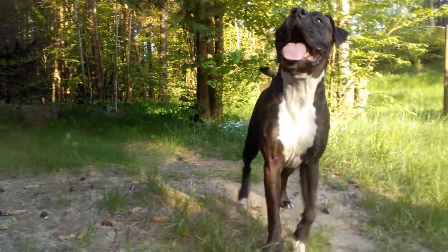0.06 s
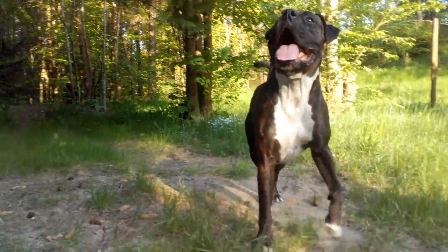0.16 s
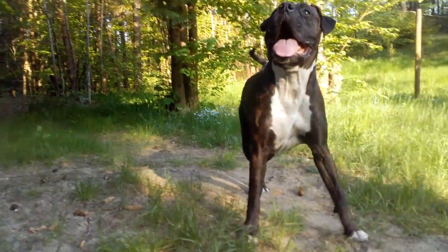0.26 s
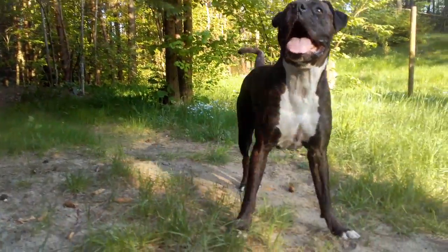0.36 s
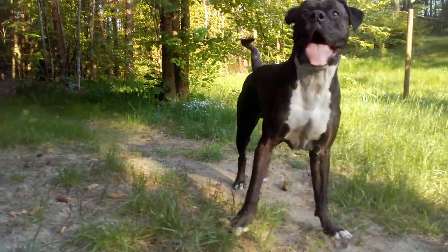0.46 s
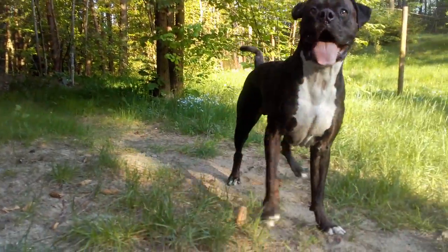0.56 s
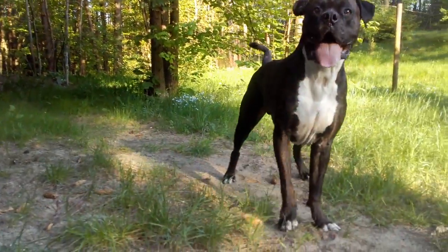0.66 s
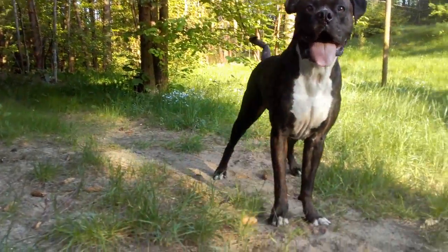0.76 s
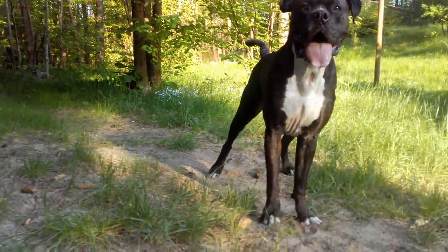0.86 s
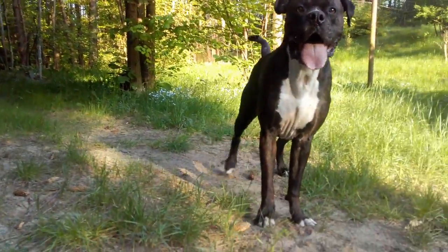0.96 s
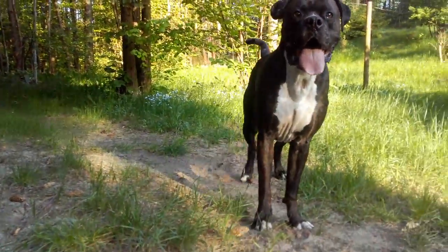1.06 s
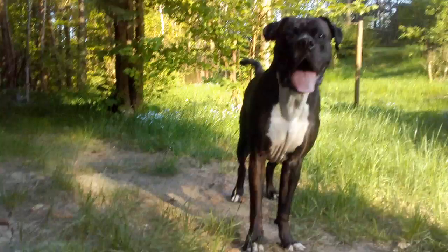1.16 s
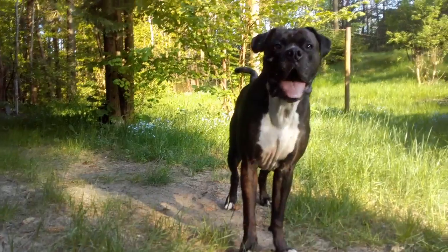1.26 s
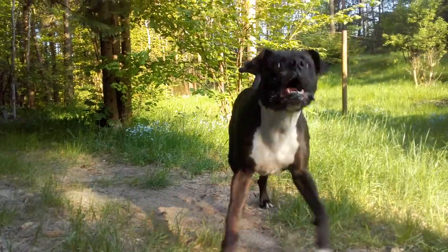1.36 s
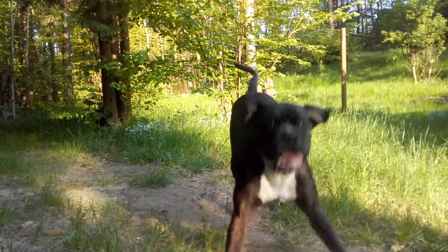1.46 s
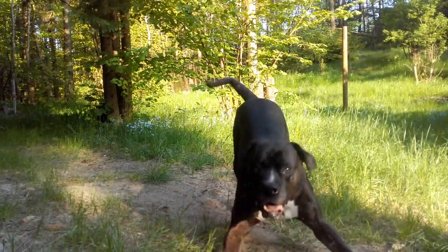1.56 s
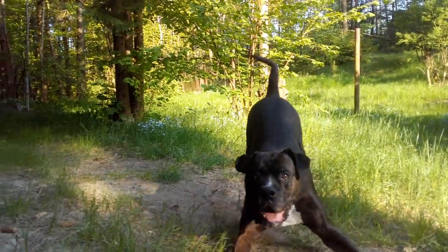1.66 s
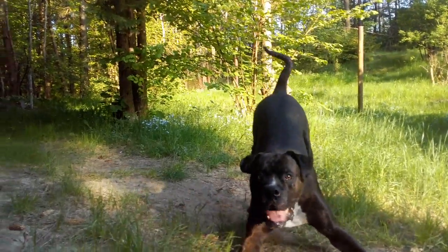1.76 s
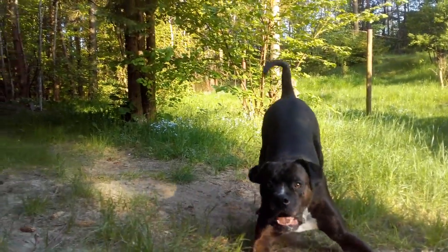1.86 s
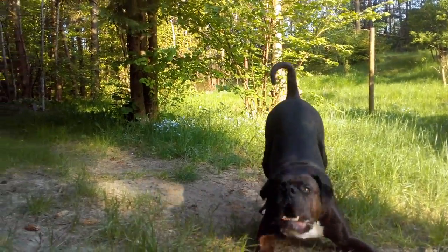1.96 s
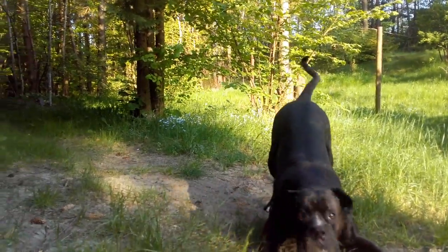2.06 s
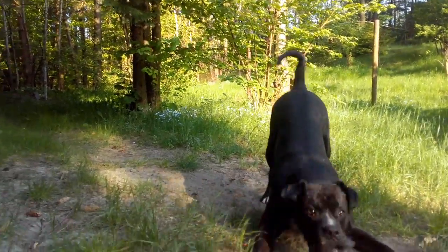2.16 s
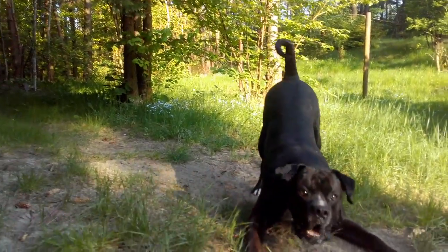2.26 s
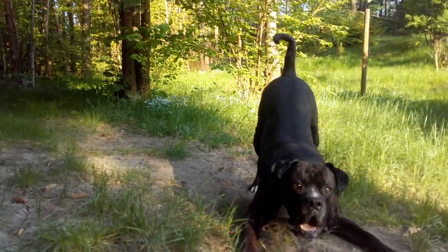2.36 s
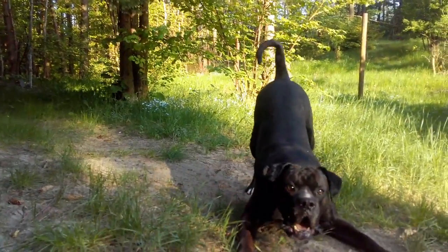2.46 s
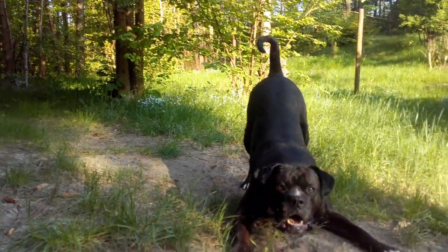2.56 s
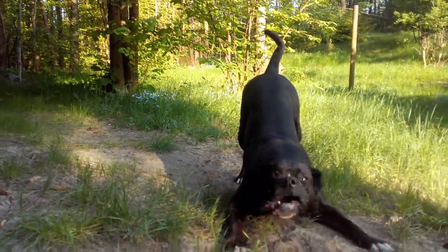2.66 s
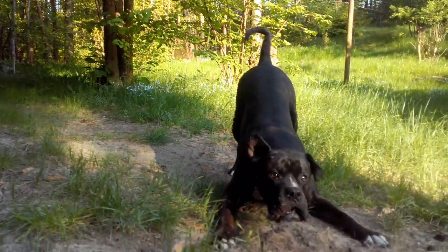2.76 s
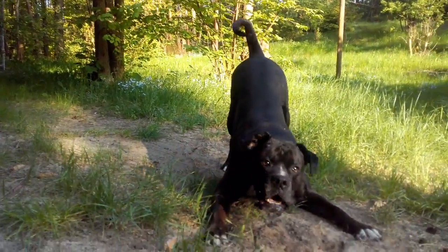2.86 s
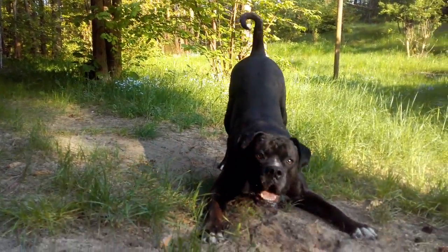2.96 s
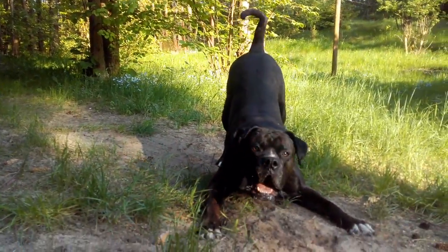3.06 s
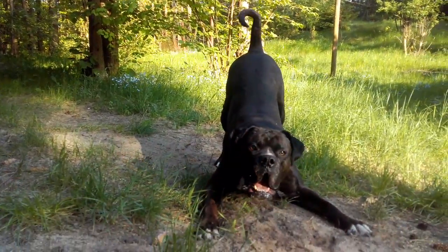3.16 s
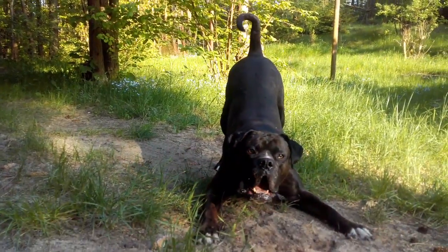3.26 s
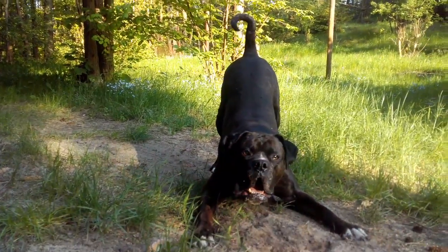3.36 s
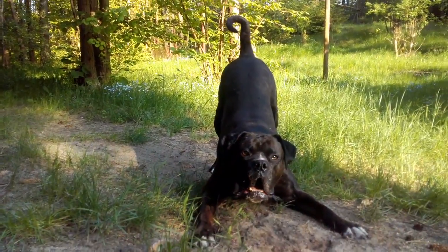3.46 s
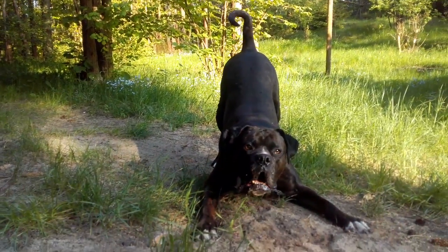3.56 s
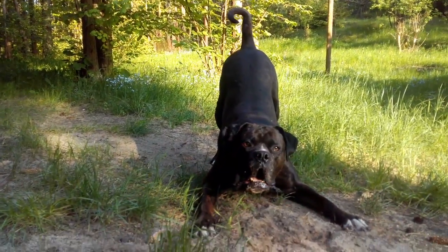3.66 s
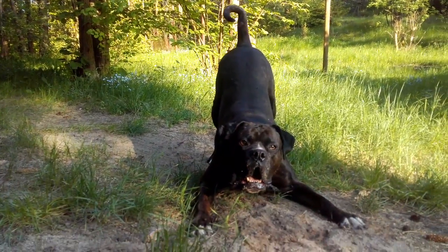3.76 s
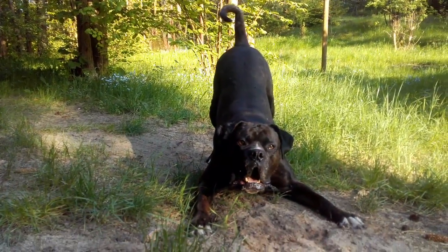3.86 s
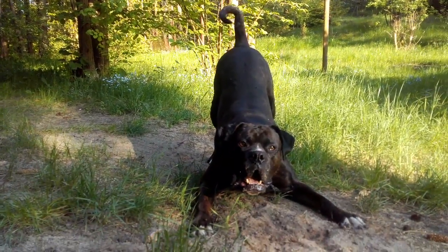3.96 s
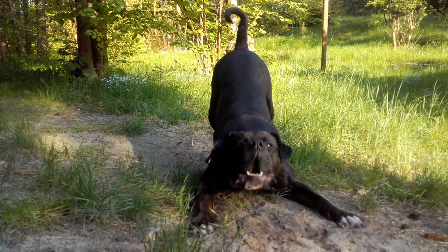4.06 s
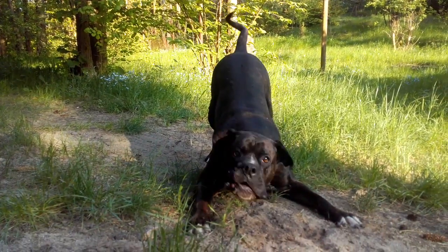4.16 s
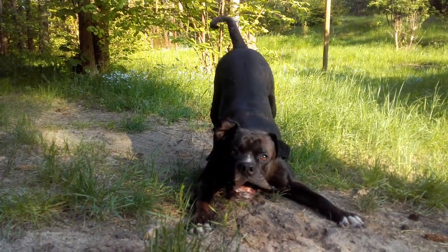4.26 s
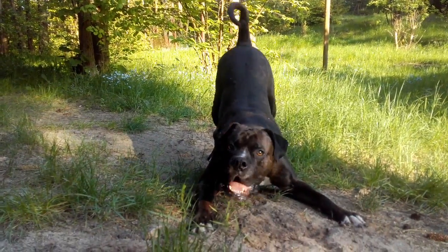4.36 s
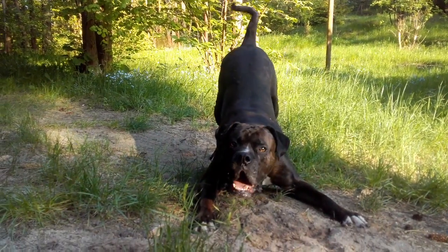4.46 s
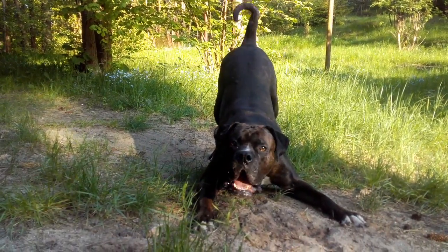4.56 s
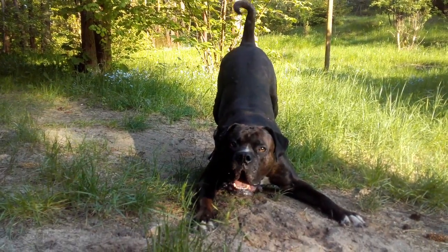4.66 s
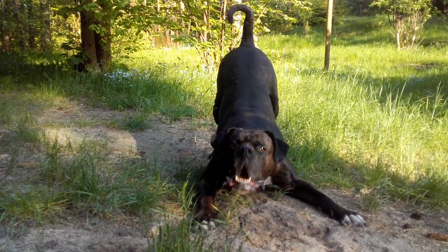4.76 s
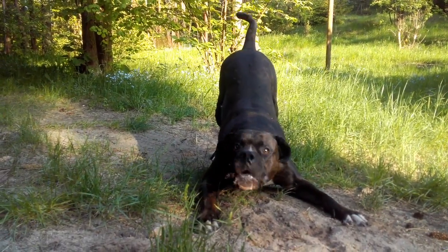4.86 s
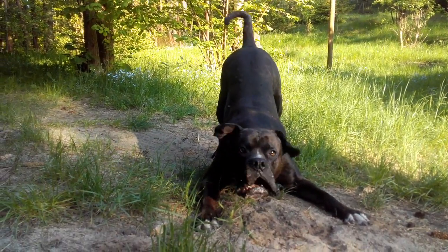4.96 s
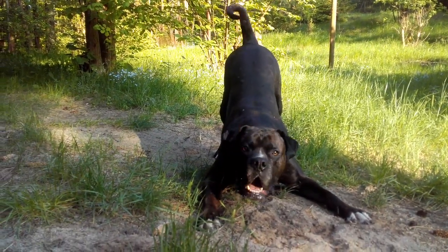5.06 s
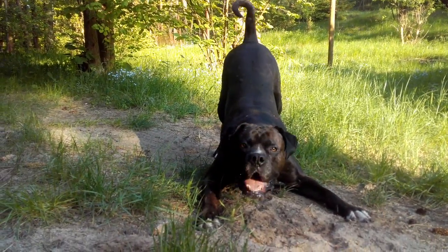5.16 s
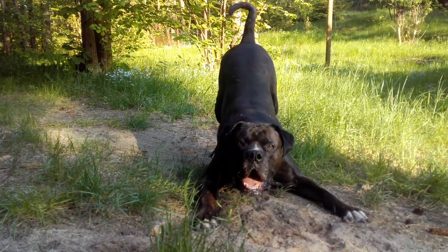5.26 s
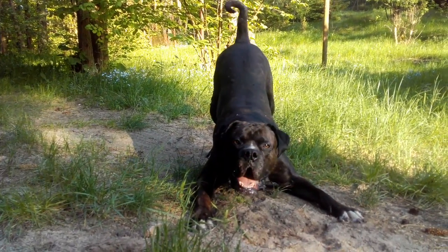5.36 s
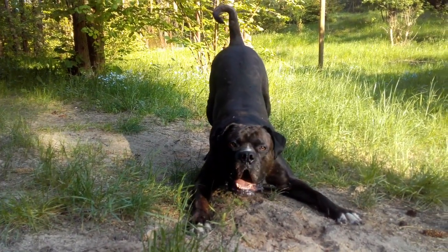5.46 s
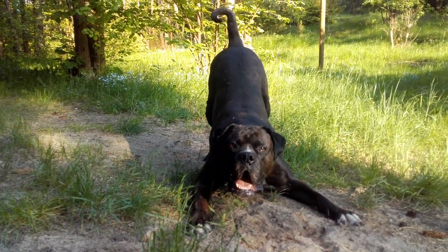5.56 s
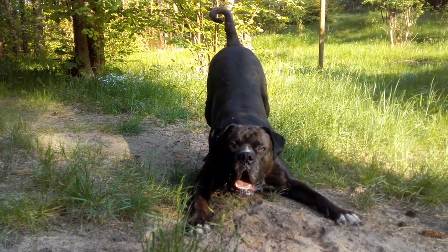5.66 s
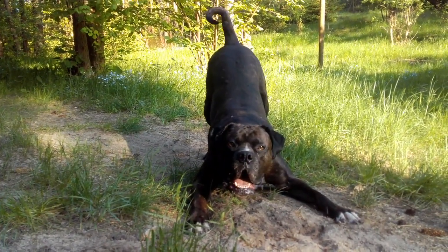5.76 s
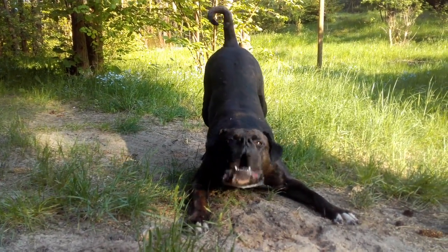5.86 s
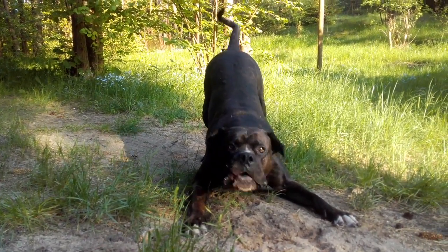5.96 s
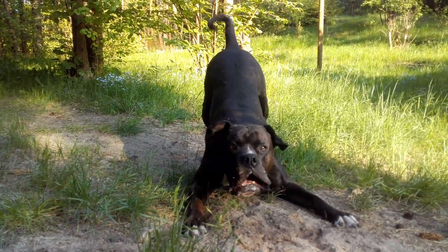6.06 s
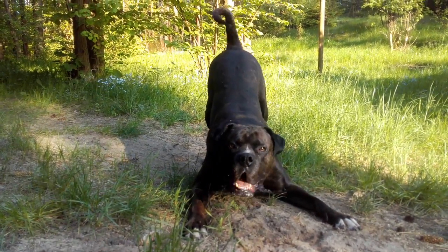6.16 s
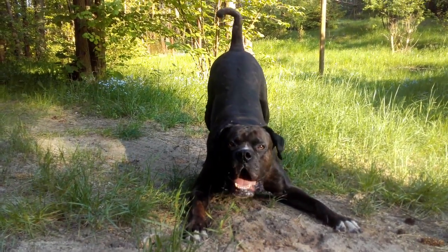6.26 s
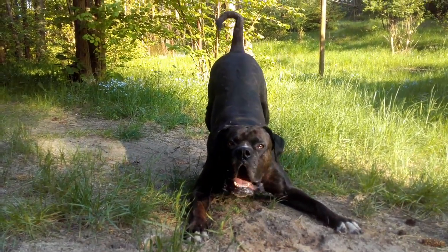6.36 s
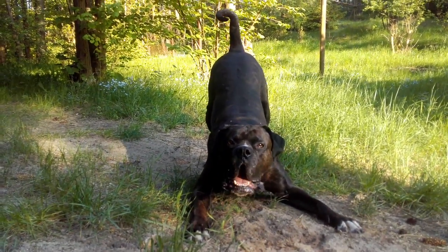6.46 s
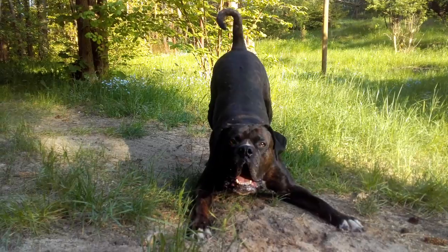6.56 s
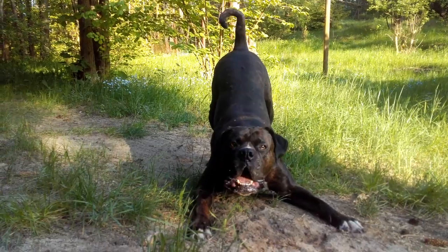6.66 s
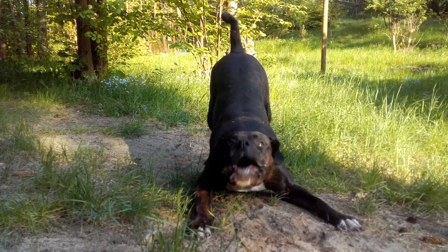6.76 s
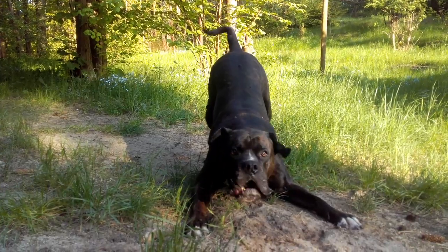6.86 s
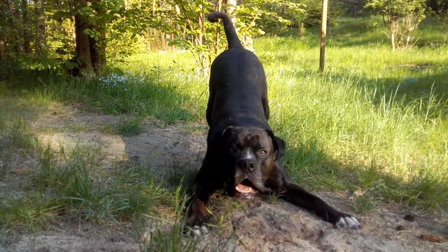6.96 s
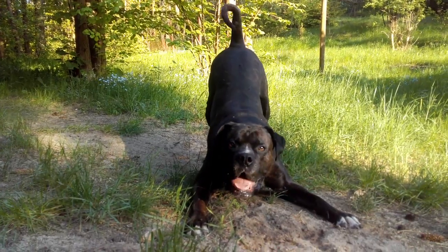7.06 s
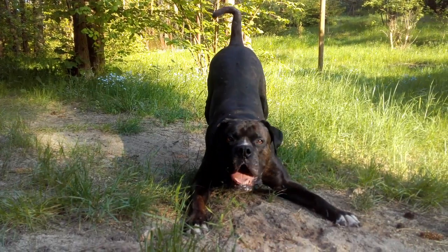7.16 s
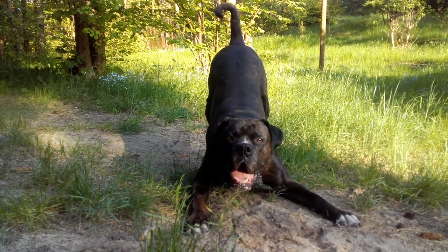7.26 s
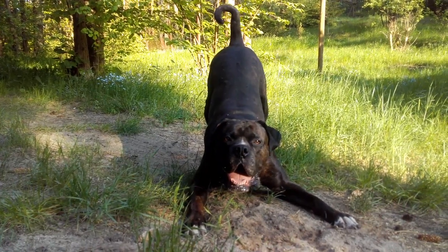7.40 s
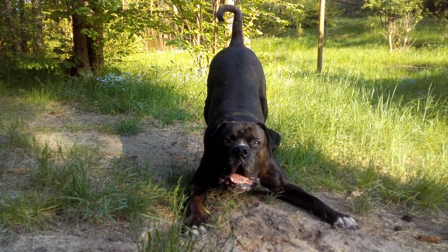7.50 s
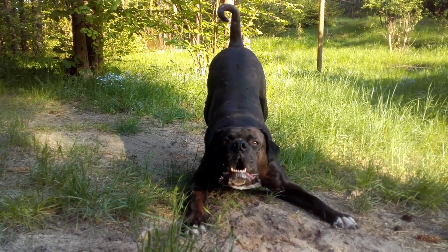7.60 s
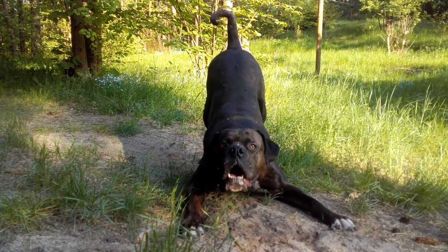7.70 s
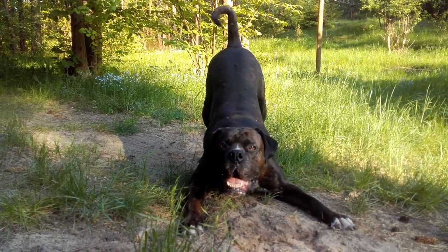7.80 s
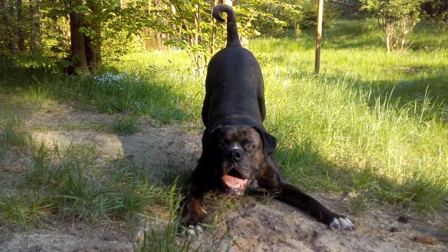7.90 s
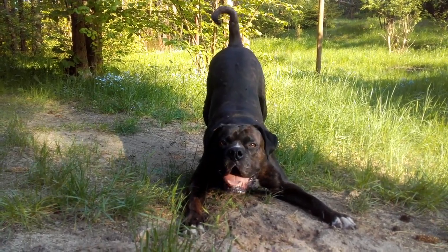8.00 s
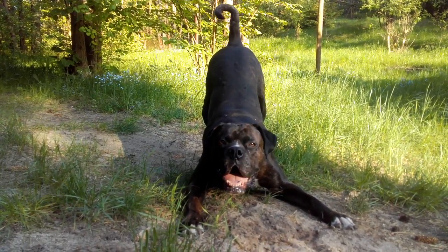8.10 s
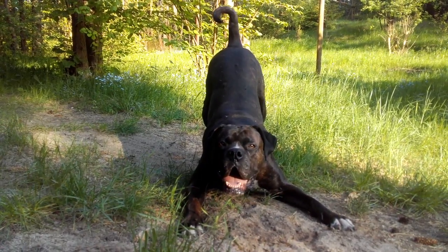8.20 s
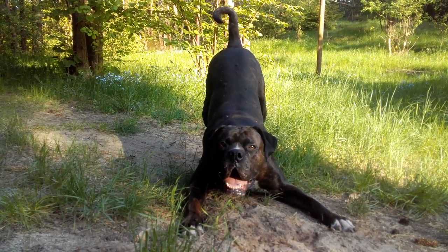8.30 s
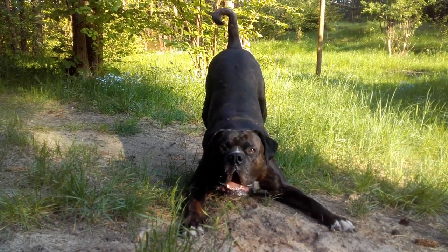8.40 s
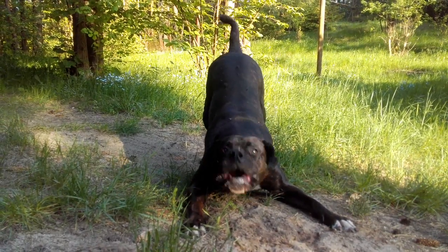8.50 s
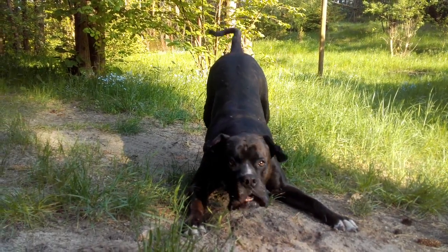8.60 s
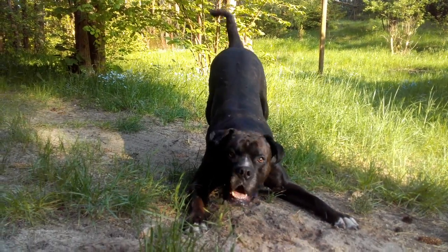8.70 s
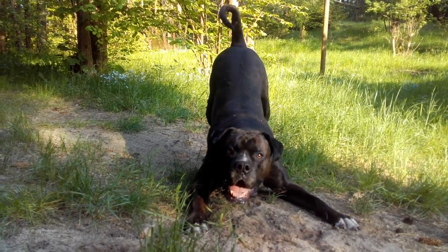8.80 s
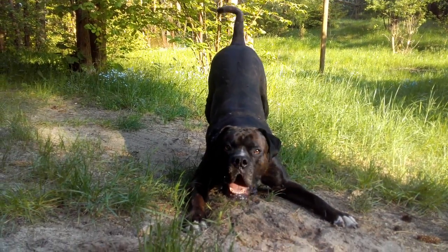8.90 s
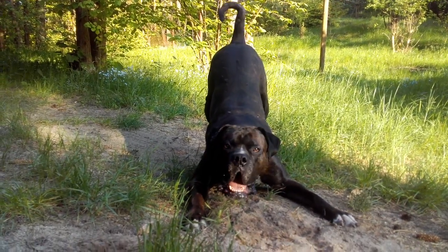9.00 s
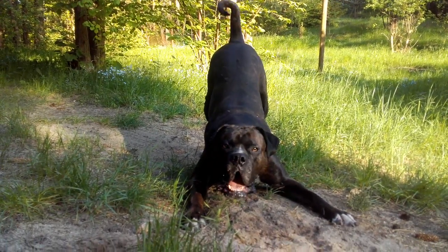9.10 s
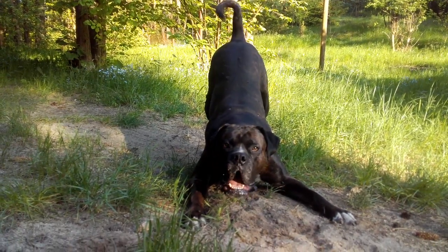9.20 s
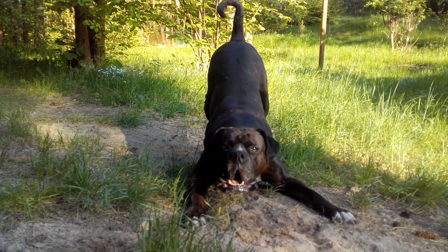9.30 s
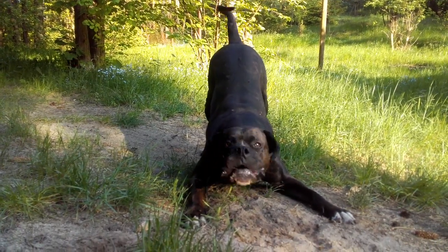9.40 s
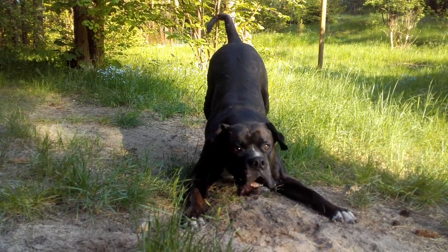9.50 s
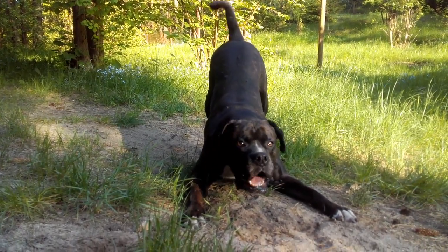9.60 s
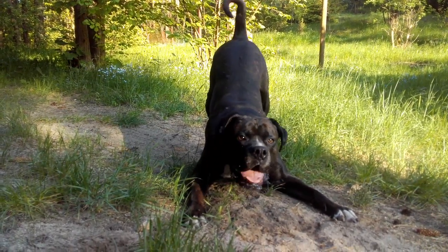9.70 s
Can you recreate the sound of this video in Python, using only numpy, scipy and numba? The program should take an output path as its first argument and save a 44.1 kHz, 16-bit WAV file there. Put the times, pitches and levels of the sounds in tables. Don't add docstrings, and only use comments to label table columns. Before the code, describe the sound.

In a quiet woodland clearing a big dog pants briefly, gives a high, snorty half-woof, and lets a few paw thuds fall. Then come loud, hoarse single barks, roughly one a second, each catching in a creak, sagging in pitch and ending in a breathy puff. Thrushes whistle far off over faint leaf hush. The microphone is close to the dog; the barks are dry with only a faint tree echo.

```python
import sys
import numpy as np
from scipy import signal
from scipy.fft import rfft, irfft
from scipy.io import wavfile
from scipy.ndimage import uniform_filter1d, minimum_filter1d
from numba import njit

SR = 44100
rng = np.random.default_rng(int(sys.argv[2]) if len(sys.argv) > 2 else 0)


def boost_factor(decibels):
    exponent = np.asarray(decibels, float) / 20
    return 10 ** exponent


def store_pcm(level_fs):
    pcm = np.round(np.clip(level_fs, -1, 1) * 32767).astype(np.int16)
    wavfile.write(sys.argv[1], SR, np.atleast_2d(pcm).T)


N = 429534


def unit(x):
    return x / np.sqrt(np.mean(x ** 2) + 1e-20)


def evened(x):
    return x / np.sqrt(uniform_filter1d(x ** 2, SR // 40) + 1e-12)


def played(tables, level, fade_s=0.0031):
    s, *columns = np.concatenate(tables).T
    t = np.arange(N) / SR
    columns = [np.interp(t, s, c) for c in columns]
    gate = sum((t >= rows[0][0] - .003) & (t < rows[-1][0] + .003) for rows in tables) > 0
    columns[level] = boost_factor(columns[level]) * uniform_filter1d(gate * 1., int(fade_s * SR))
    return columns


def wander(rate):
    lowpass = signal.butter(2, rate, fs=SR / 32, output="sos")
    slow = signal.sosfilt(lowpass, rng.standard_normal(N // 32 + 2002))
    return np.interp(np.arange(N) / 32, np.arange(N // 32 + 2), unit(slow[2000:]))


def band(x, low_hz, high_hz, order=2):
    return signal.sosfilt(signal.butter(order, [low_hz, high_hz], "band", fs=SR, output="sos"), x)


def airway(x, modes):
    out = 0
    for k, (hz, width, db) in enumerate(modes):
        r = np.exp(-np.pi * width / SR)
        a = [1, -2 * r * np.cos(2 * np.pi * hz / SR), r * r]
        out = out + (-1) ** k * boost_factor(db) * signal.lfilter([(1 - r * r) / 2, 0, (r * r - 1) / 2], a, x)
    return out


@njit
def moving(x, c, r):
    y = np.zeros(len(x))
    for i in range(2, len(x)):
        y[i] = (1 - r * r) / 2 * (x[i] - x[i - 2]) + 2 * r * c[i] * y[i - 1] - r * r * y[i - 2]
    return y


# (time [s], level [dB])
WOOD_SWELL = [(0.0, -56), (.7, -61), (1.25, -62), (1.8, -58), (2.55, -60), (3.7, -68.5), (4.601, -64),
              (5.8, -67), (7.45, -65), (8.4, -67.5), (9.249, -72), (9.74, -65)]
# (frequency [Hz], density [dB per Hz])
LEAF_COLOUR = [(25, -15), (100, -5), (300, -1.5), (800, -0.5), (2000, -5), (4400, -19), (6000, -26),
               (9000, -47.5)]


def wood():
    s, db = np.transpose(WOOD_SWELL)
    hz, per_hz = np.transpose(LEAF_COLOUR)
    grid = np.arange(1, N // 2 + 2) * SR / N
    colour = boost_factor(np.interp(np.log(grid), np.log(hz), per_hz, right=-70))
    hush = irfft(rfft(rng.standard_normal(N)) * colour, N)
    return boost_factor(np.interp(np.arange(N) / SR, s, db) + .7 * wander(1.7)) * unit(hush)


# (time [s], length [s], first pitch [Hz], last pitch [Hz], level [dB])
THRUSHES = [(0.0, 0.148, 2235, 2197, -44), (.075, .07, 2800, 2530, -59), (0.27, 0.19, 2860, 3030, -53.5),
            (0.419, .05, 2960, 2510, -48), (.465, 0.023, 2490, 2510, -46.5), (4.4, 0.22, 2340, 2108, -49.5),
            (4.67, .17, 2590, 2563, -51.5), (4.814, .05, 1866, 1830, -53.5), (5.1, 0.19, 2192, 2376, -50.5),
            (5.226, 0.072, 2533, 2507, -47.5), (5.281, 0.1, 2640, 2508, -57.5),
            (5.545, 0.11, 1800, 2004, -54), (5.651, 0.089, 2193, 2056, -51.5),
            (6.03, 0.14, 3370, 3290, -57.5), (7.261, .16, 2236, 2240, -65.5)]
# (time [s], length [s], first pitch [Hz], last pitch [Hz], level [dB])
THIN_WHISTLE = [
    (3.221, 0.25, 4460, 4500, -78),
    (3.76, 0.45, 4380, 4530, -77.5),
    (3.98, 0.098, 3400, 3330, -79.5),
    (4.702, 0.11, 4650, 4620, -79),
    (6.251, 0.13, 6920, 7000, -77),
    (6.38, 0.43, 3280, 3350, -77.5),
]
# (time [s], level [dB])
RASPS = [
    (.38, -63.5),
    (1.041, -73),
    (3.13, -76.5),
    (4.522, -66.5),
    (5.881, -71.5),
    (7.56, -79),
    (8.92, -73),
]


def birds():
    out, waver, swell = np.zeros(N + SR), wander(60), boost_factor(2.5 * wander(30))
    for song, flutter in ((THRUSHES, .011), (THIN_WHISTLE, .004)):
        for s, length, first_hz, last_hz, db in song:
            i, at = int(max(s, 0) * SR), np.linspace(0, 1, int(length * SR))
            here = slice(i, i + len(at))
            knots = [0, 0.29, 1]
            glide = np.interp(at, knots, [first_hz, first_hz + 0.32 * (last_hz - first_hz), last_hz])
            hz = glide * (1 + flutter * waver[here])
            gain = boost_factor(db + np.interp(at, knots, [-3, 0, -4.5])) * signal.windows.tukey(len(at), .3)
            out[here] += gain * swell[here] * np.sin(2 * np.pi * np.cumsum(hz) / SR)
    t = np.arange(N) / SR
    rasp = sum(boost_factor(db) * np.exp(-((t - s) / .07) ** 2) for s, db in RASPS)
    return out[:N] + rasp * unit(band(rng.standard_normal(N), 3300, 3800))


def trees(x, t60_s):
    t = np.arange(2 * SR) / SR
    tail = band(rng.standard_normal(2 * SR), 150, 4400, order=1)
    tail = tail * boost_factor(-60 * t / t60_s) * (1 - np.exp(-t / .03))
    return signal.fftconvolve(x, tail / np.sqrt(np.sum(tail ** 2)))[:N]


# (start [s], end [s], level [dB])
BREATHS = [
    (-.02, 0.017, -41),
    (0.357, 0.483, -41),
    (.81, 0.943, -49),
]
# (centre [Hz], width [Hz], gain [dB])
OPEN_TUBE = [(493, 34, 3), (864, 130, -2.5), (1347, 77, 1.5), (2090, 84, -3), (2670, 340, -15.5)]


def pant():
    rise_s, fall_s, edge_db = 0.0083, 0.1, -33.5
    rows = [[(s - rise_s, db + edge_db), (s + rise_s, db), (end, db), (end + fall_s, db + edge_db)]
            for s, end, db in BREATHS]
    gain, = played(rows, level=0)
    return gain * unit(band(airway(rng.standard_normal(N), OPEN_TUBE), 380, 3500))


# (centre [Hz], width [Hz], gain [dB])
MOUTH_MODES = [(1000, 150, 5.5), (1630, 170, 0.5), (1875, 200, 3.5), (2254, 210, -1.5)]


def mouth(x):
    return band(airway(x, MOUTH_MODES), 580, 2700, order=4)


# (centre [Hz], width [Hz], gain [dB])
TEETH_MODES = [(2790, 280, 3), (3800, 200, -9), (4710, 720, 1), (5270, 210, 2.5), (5870, 230, 2),
               (6200, 110, -7), (8700, 100, -15.5), (9200, 490, -8), (12700, 1000, -27), (15200, 720, -29)]


def hiss():
    air, out = rng.standard_normal(N), 0
    for hz, width, db in TEETH_MODES:
        centre = np.cos(2 * np.pi * hz * (1 + .022 * wander(9)) / SR)
        wide = airway(air, [(hz, 3.2 * width, db)])
        ring = moving(wide, centre, np.exp(-np.pi * width / SR))
        out = out + boost_factor(3.0 * wander(18)) * ring
    return unit(out)


# (start [s], end [s], first level [dB], last level [dB], mouth re chest [dB])
LEAKS = [
    (1.334, 1.472, -66, -46.5, 5.5),
    (2.013, 2.063, -42, -19.5, -18.5),
    (4.098, 4.151, -43, -22, -19),
    (4.85, 4.906, -47.5, -19.5, -15),
    (5.896, 5.955, -60, -21.5, -18),
    (6.74, 6.808, -51.5, -21, -29),
    (7.559, 7.724, -57.5, -24, -19.5),
    (8.451, 8.55, -62, -21, -19),
    (9.294, 9.418, -58.5, -26, -30.5),
]
# (first time [s], last time [s], first peak [dB], last peak [dB])
FLAPS = [(1.343, 1.385, -45, -50), (1.405, 1.424, -33.5, -36.5), (2.012, 2.041, -33, -29.5),
         (4.104, 4.103, -39.5, -36), (4.853, 4.879, -43, -29.5), (5.917, 5.919, -35, -41),
         (6.747, 6.782, -39, -25), (7.56, 7.62, -53.5, -33.5), (7.646, 7.677, -34, -32),
         (8.452, 8.466, -56.5, -40.5), (8.489, 8.505, -34, -30.5), (9.306, 9.382, -49.5, -36)]
# (centre [Hz], width [Hz], gain [dB])
LEAK_CHEST = [(253, 200, -10), (500, 22, 2)]


def creak():
    rows = [[(s, first, db), (end, last, db)] for s, end, first, last, db in LEAKS]
    gain, mouth_db = played(rows, level=0)
    air = rng.standard_normal(N) * boost_factor(1.0 * wander(70))
    leak_chest = unit(band(airway(air, LEAK_CHEST), 160, 1400))
    leak = gain * (leak_chest + boost_factor(mouth_db) * unit(mouth(air)))
    runs = [np.linspace((s, first), (end, last), 1 + int((end - s) / .0155 + .25))
            for s, end, first, last in FLAPS]
    s, db = np.concatenate(runs).T
    flaps = np.full(N, 1e-18)
    flaps[(s * SR).astype(int)] = 60 * boost_factor(db)
    low = band(airway(flaps, [(238.8, 230, -9.5), (490, 99, 8)]), 110, 730)
    high = band(airway(flaps, [(895, 200, -3), (1800, 270, 2)]), 600, 2400, order=4)
    return boost_factor(-2) * leak + low + boost_factor(-15) * high


def syllable(course, start, end, first_hz, last_hz, db, jaw_db, grow_db=0, throat_db=0):
    return [(start + at * (end - start), first_hz + fall * (last_hz - first_hz),
             db + chest, throat_db + throat, jaw_db + jaw,
             -29.5 + 0.83 * (jaw_db + jaw) + grow_db * at ** 3)
            for at, fall, chest, throat, jaw in course]


# (start [s], end [s], last pitch [Hz], chest [dB], widest jaw re chest [dB])
BARK_PUSHES = [
    (2.074, 2.14, 383.2, -10.5, -1.5),
    (2.712, 2.788, 347.8, -14, -5.5),
    (4.146, 4.215, 373.4, -9.5, -7.5),
    (4.899, 4.955, 450.6, -10, -5),
    (5.955, 6.015, 422.1, -13, -4),
    (6.801, 6.863, 416.2, -12, -5.5),
    (8.539, 8.612, 460, -10.5, -6),
    (9.411, 9.489, 443, -11.5, -9),
]
# (start [s], end [s], first pitch [Hz], last pitch [Hz], chest [dB])
BARK_SAGS = [
    (2.143, 2.22, 380.2, 378.6, -8.5),
    (2.794, 2.883, 400.2, 268, -11.5),
    (4.218, 4.31, 387, 266.6, -10),
    (4.965, 5.06, 443.8, 257.9, -11.5),
    (6.025, 6.112, 380.2, 288.1, -12),
    (6.873, 6.974, 429.7, 266.4, -12.5),
    (8.62, 8.703, 395, 267.5, -13),
    (9.496, 9.568, 407.4, 261.4, -13.5),
]
# (start [s], end [s], first pitch [Hz], chest [dB], widest jaw re chest [dB])
HALF_WOOFS = [
    (1.436, 1.516, 580.9, -16, -7),
    (7.682, 7.765, 438, -26.5, -15),
]
# (share of length, share of pitch fall, chest [dB], throat re chest [dB], jaw re widest [dB])
PUSH_COURSE = [(0, 0.039, -7.5, -12.5, -13.5), (.3, .15, -1, -12, -6.5), (.62, .6, 1, -11, -2),
               (1, 0.96, -4.5, -11.5, -6)]
SAG_COURSE = [(0, 0, -1.5, -9, -8), (.35, .2, -1, -2, 0), (.72, .95, -7.5, -6.5, -4),
              (1, 1, -9, -11.5, -14)]
WOOF_COURSE = [(0, 0, -16.5, 5, 0), (.45, .3, -6, -0.5, -2), (.62, .6, 3.5, -2.5, -2), (1, 1, -15, -1, 2)]


def barks():
    pushes = [syllable(PUSH_COURSE, s, end, 458.7, hz, db, jaw) for s, end, hz, db, jaw in BARK_PUSHES]
    sags = [syllable(SAG_COURSE, *row, jaw_db=-11, grow_db=14) for row in BARK_SAGS]
    woofs = [syllable(WOOF_COURSE, s, end, hz, .85 * hz, db, jaw,
                      throat_db=3.6 * (jaw + 7))
             for s, end, hz, db, jaw in HALF_WOOFS]
    return sorted(pushes + woofs + sags)


def voice(teeth):
    hz, gain, throat_db, open_db, hiss_db = played(barks(), level=1)
    phase = 2 * np.pi * np.cumsum(hz * (1 + .045 * wander(55))) / SR
    slip = [wander(40) for _ in range(4)]
    swell = [boost_factor(3.5 * chance) for chance in slip]
    folds = [swell[k % 4] * np.cos(k * phase + .25 * k * slip[(k + 1) % 4]) for k in range(1, 7)]
    air = rng.standard_normal(N) * (1 + 0.97 * np.cos(phase))
    low = 1.6 * folds[0] + folds[1] + .5 * folds[2] + 5.0 * band(air, 380, 900, order=3)
    chest = band(airway(low, [(460, 300, 0)]), 255, 640, order=3)
    throat = band(airway(low, [(705, 160, 0)]), 580, 900)
    source = sum(folds) + 2.1 * air
    jaw_hz = np.clip(1331.5 + 16 * open_db, 900, 1400)
    jaw = moving(source, np.cos(2 * np.pi * jaw_hz / SR), np.exp(-np.pi * 120 / SR))
    front = mouth(source) + 2.5 * band(jaw, 610, 1800)
    gust = boost_factor(-32.0) * unit(band(air, 120, 440))
    voiced = evened(chest) + boost_factor(throat_db) * evened(throat) + boost_factor(open_db) * evened(front)
    return gain * (voiced + boost_factor(hiss_db) * teeth + gust)


# (time [s], level [dB])
NOSE_BLAST = [
    (1.44, -74.5),
    (1.476, -54),
    (1.592, -37.5),
    (1.69, -65.5),
    (1.8, -66.5),
]
# (centre [Hz], width [Hz], gain [dB])
NOSE_MODES = [(130, 82, 7), (950, 560, 4.5), (1588, 180, 5), (2714, 250, -0.5), (3580, 1400, -3),
              (5000, 700, -1.5), (10100, 1100, -8.5), (14500, 2500, -21)]


def snort():
    gain, = played([NOSE_BLAST], level=0)
    air = rng.standard_normal(N) * boost_factor(2.0 * wander(40))
    return gain * unit(band(airway(air, NOSE_MODES), 70, 17000))


# (start [s], end [s], chest [dB], mouth re chest [dB], hiss re chest [dB])
RELEASES = [
    (1.508, 1.679, -33, 7.5, -13.5),
    (2.213, 2.375, -28.5, -7.5, -20.5),
    (2.876, 3.034, -35.5, -5, -20),
    (4.303, 4.467, -32.5, -2.5, -16),
    (5.065, 5.227, -34, -4, -20),
    (6.099, 6.268, -31, -4.5, -22.5),
    (6.964, 7.137, -33, -5.5, -19.5),
    (7.761, 7.969, -39.5, -2.5, -23.5),
    (8.69, 8.851, -31, -6, -20),
    (9.576, 9.723, -36.5, -5.5, -21),
]
# (centre [Hz], width [Hz], gain [dB])
RELEASE_CHEST = [(140, 190, -14), (434, 140, 1.5)]


def puff(teeth):
    pop_db, pop_s, dull_db = 13, 0.0044, -10.5
    hiss_ebb_db = -6.5
    slack_hz, narrow_hz = 523, 650
    rows = [[(s, db + pop_db, lips + dull_db, high + dull_db, slack_hz),
             (s + pop_s, db, lips, high, slack_hz),
             (s + 0.56 * (end - s), db - 9, lips, high + hiss_ebb_db, narrow_hz),
             (end, db - 32, lips + 4.0, high + hiss_ebb_db, narrow_hz)]
            for s, end, db, lips, high in RELEASES]
    gain, mouth_db, hiss_db, hz = played(rows, level=0, fade_s=0.0046)
    air = rng.standard_normal(N) * boost_factor(1.9 * wander(34))
    throat = moving(air, np.cos(2 * np.pi * hz / SR), np.exp(-np.pi * 77 / SR))
    chest = band(airway(air, RELEASE_CHEST) + boost_factor(6.5) * throat, 73, 1400)
    return gain * (unit(chest) + boost_factor(mouth_db) * unit(mouth(air)) + boost_factor(hiss_db) * teeth)


# (time [s], peak level [dB], thud [Hz])
FOOTFALLS = [
    (1.733, -48.5, 477),
    (1.803, -40.5, 490),
    (1.861, -43.5, 482),
    (1.921, -43.5, 480),
    (2.616, -44.5, 477),
    (2.666, -42, 590),
]


def paws():
    out, t = np.zeros(N), np.arange(2000) / SR
    for (s, db, hz), grit in zip(FOOTFALLS, rng.standard_normal((len(FOOTFALLS), 2000))):
        thud = np.sin(2 * np.pi * hz * t) + 0.53 * band(grit, 600, 1600)
        out[int(s * SR):][:2000] += boost_factor(db) * thud * np.exp(-t / 0.0078)
    return out


# (time [s], level [dB])
LIP_SMACKS = [
    (7.001, -50),
    (8.725, -53.5),
]


def smacks(teeth):
    t = np.arange(N) / SR
    pulses = sum(boost_factor(db) * np.exp(-((t - s) / .003) ** 2) for s, db in LIP_SMACKS)
    return band(teeth, 4500, 11000) * pulses


def scene():
    teeth = hiss()
    dog = voice(teeth) + creak() + puff(teeth) + smacks(teeth) + snort() + pant() + paws()
    near_echo = boost_factor(-43) * trees(dog, t60_s=1)
    treeline_s = .12
    late = np.concatenate([np.zeros(int(treeline_s * SR)), trees(dog, t60_s=1.3)])[:N]
    song = birds()
    far = boost_factor(2.5) * song + boost_factor(-8) * trees(song, t60_s=1.0)
    return (dog + near_echo + boost_factor(-54) * late + far + wood())[None]


def top_cut(x):
    return signal.sosfilt(signal.butter(12, 15830, fs=SR, output="sos"), x)


def record(dry):
    limit = .62
    peak = -minimum_filter1d(-np.abs(dry), SR // 120, axis=-1)
    gain = np.minimum(1, (limit / (peak + 1e-9)) ** .7)
    held = dry * uniform_filter1d(gain, SR // 160, axis=-1)
    rumble = signal.sosfilt(signal.butter(2, 50, fs=SR, output="sos"), held ** 2)
    self_noise = boost_factor(-90) * unit(band(rng.standard_normal(N), 3000, 17000, order=1))
    mix = held - 0.059 * rumble - .0004 + self_noise
    return top_cut(mix)


dry = scene()
out = record(dry)
store_pcm(out)
```